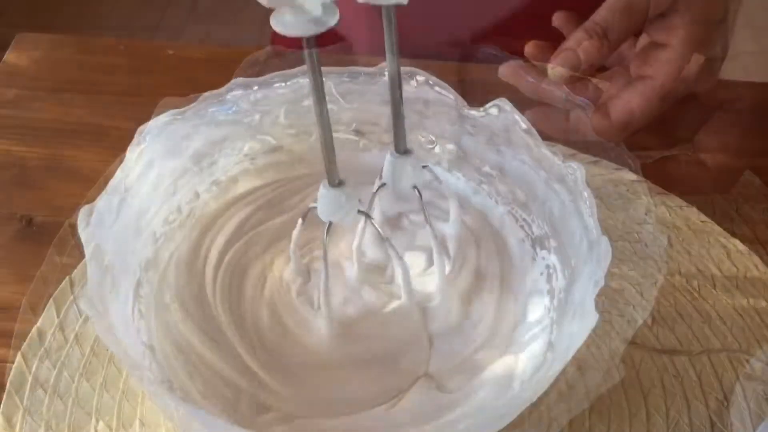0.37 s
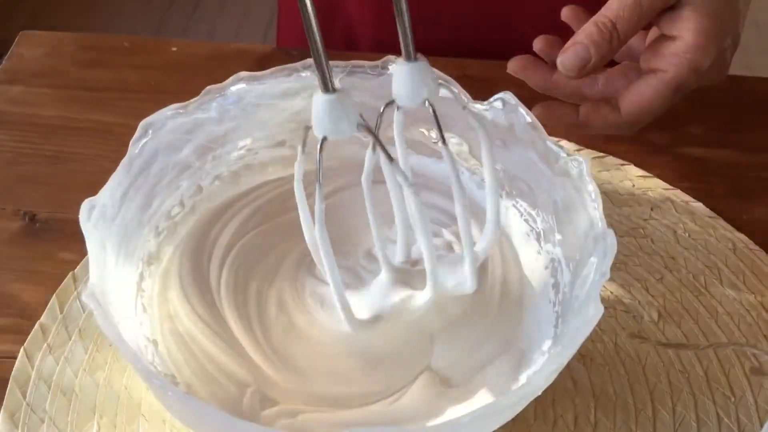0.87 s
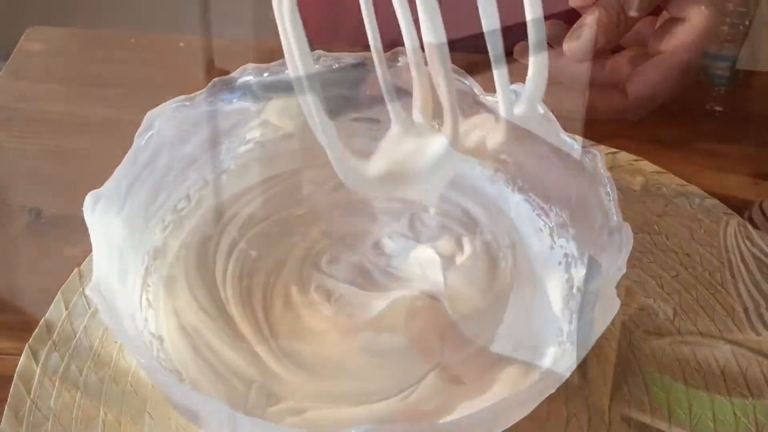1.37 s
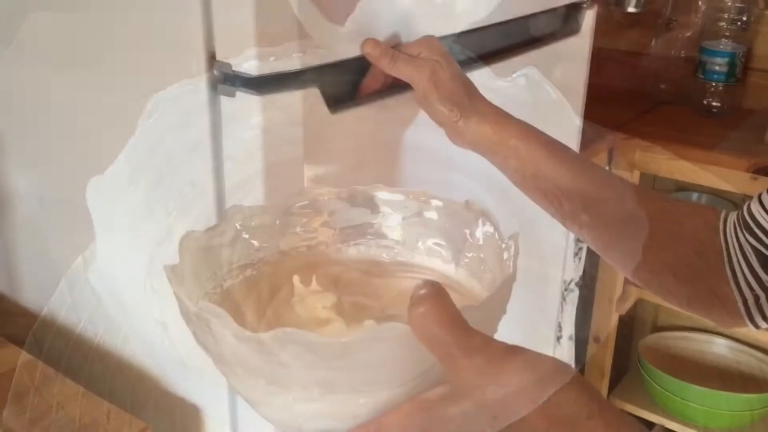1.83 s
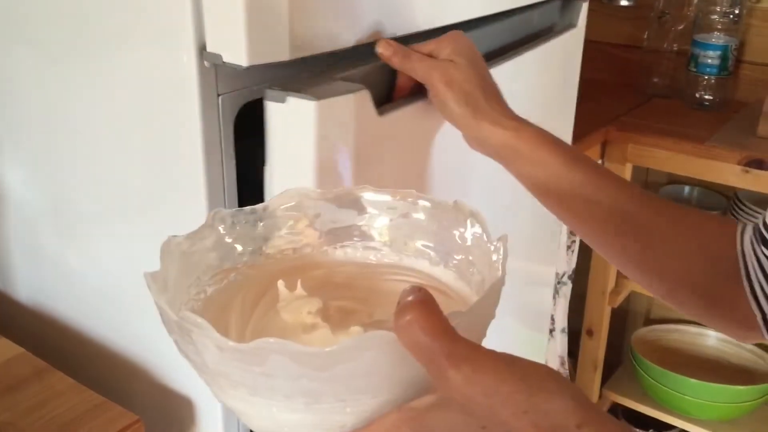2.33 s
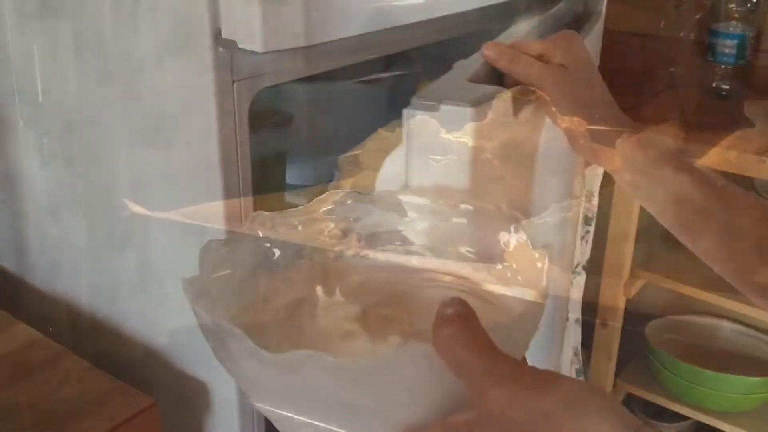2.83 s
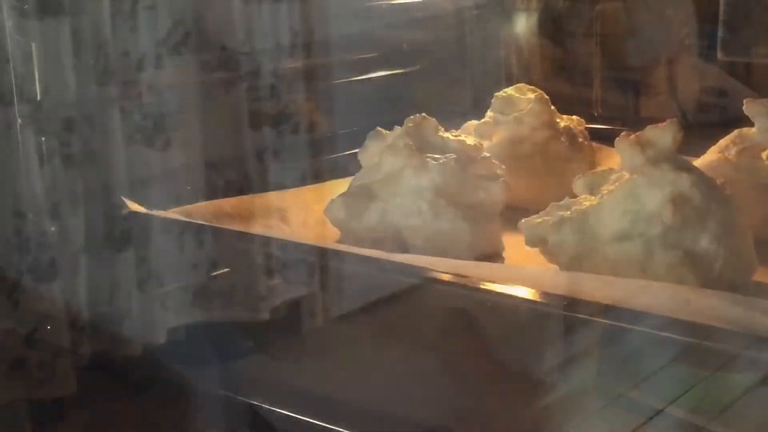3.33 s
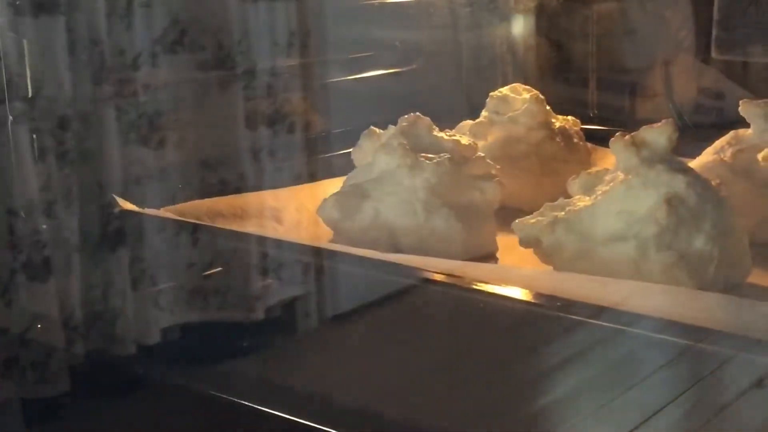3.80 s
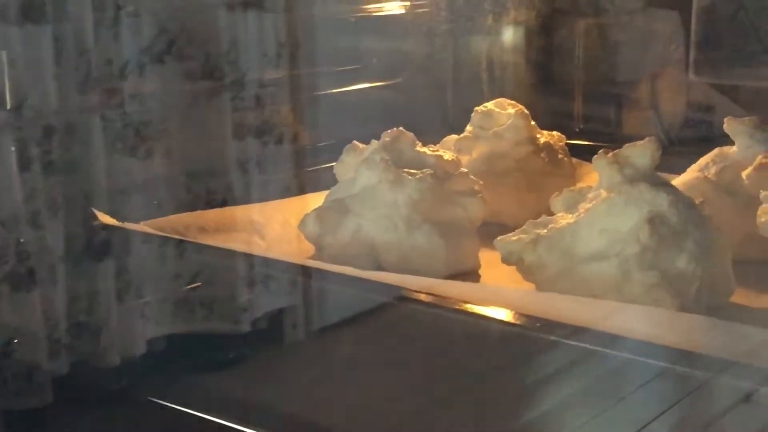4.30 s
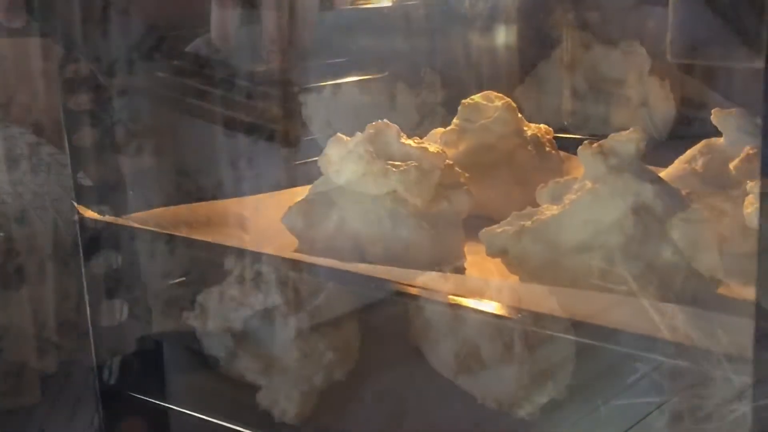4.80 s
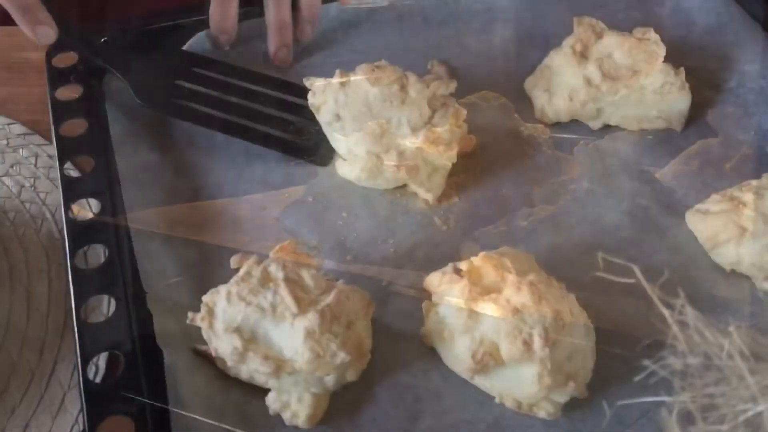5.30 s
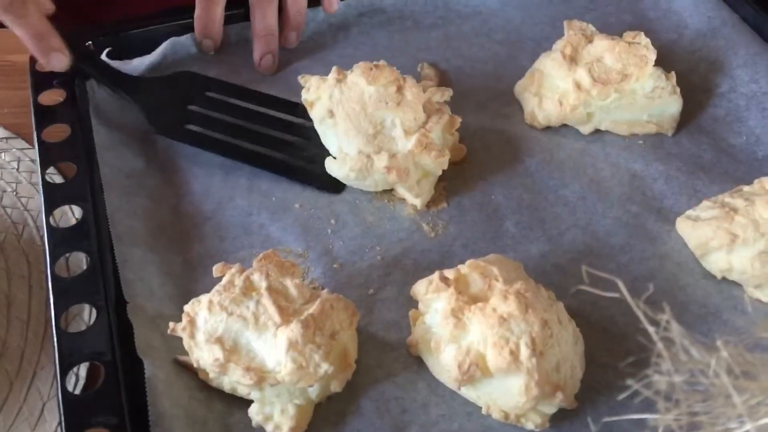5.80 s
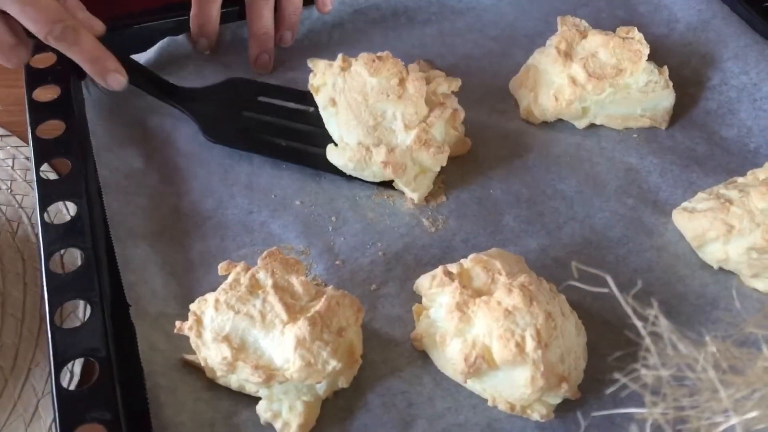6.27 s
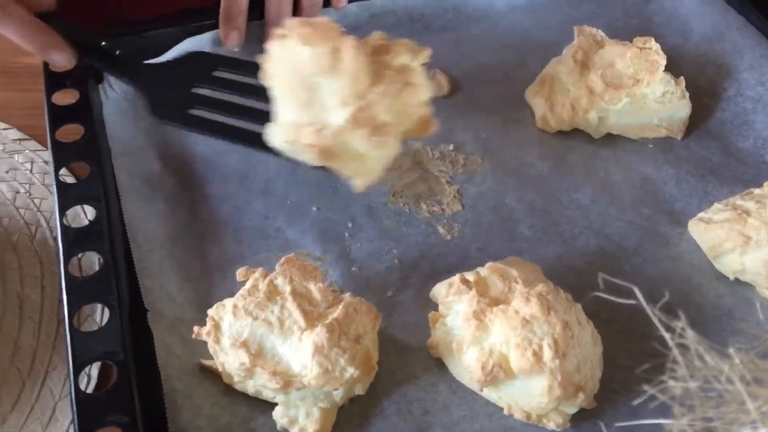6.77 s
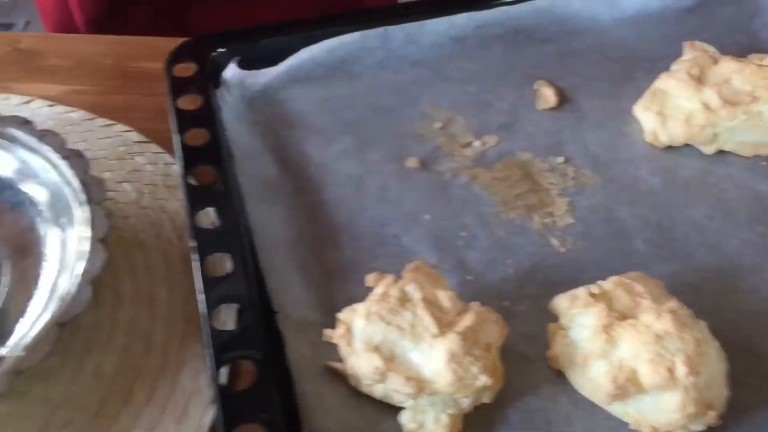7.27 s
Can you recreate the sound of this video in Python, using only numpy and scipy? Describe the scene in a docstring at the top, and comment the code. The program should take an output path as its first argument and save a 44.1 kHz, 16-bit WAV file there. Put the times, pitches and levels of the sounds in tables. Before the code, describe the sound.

Electric mixer drone fading quickly, fridge seal peel and thump, faint ticking over a low oven drone, then gritty scraping, crisp cracks and tray knocks.

```python
"""A spatula scrapes meringue off baking paper (gritty noise), the crust cracks (short noise splinters) and
the sheet-metal tray knocks on the table (struck modes): the last of four kitchen scenes. Before it a hand
mixer fades out (shaped noise, armature tones, mains buzz); a fridge door peels off its seal (noise snaps)
and thumps (modes); a wind-up timer ticks (modes) by an oven whose fan drones (resonant noise).
A small hard room (noise tail) and a wandering rumble and hiss lie behind it."""
import sys
import numpy as np
from scipy import signal
from scipy.fft import rfft, irfft
from scipy.io import wavfile
from scipy.ndimage import uniform_filter1d

SR = 44100
rng = np.random.default_rng(int(sys.argv[2]) if len(sys.argv) > 2 else 0)


def digitize_waveform(pressure):
    """Quantize a signal to 16-bit integers and store it at the path in sys.argv[1].

    Rows of a 2-D input are taken as channels; values are limited to [-1, 1].
    """
    field = np.atleast_2d(pressure).T
    bounded = np.clip(field, -1, 1)
    quanta = np.round(bounded * 32767).astype(np.int16)
    wavfile.write(sys.argv[1], SR, quanta)


def volts_from_db(level):
    """Convert decibel levels to linear amplitude ratios."""
    exponent = np.asarray(level, float) / 20
    return 10 ** exponent


N = 336483
t = np.arange(N) / SR
LEAD_S = .01  # a burst peaks this long after its start

# spatula on paper: t/s, level/dB, treble relative to it/dB
RUB_LEVELS = [(4.62, -70, -21), (4.69, -69, -4), (4.73, -58.5, 2), (4.78, -64, 5.5), (4.88, -52, -2),
              (4.97, -59, 1.5), (5.03, -43, -0.5), (5.11, -43.5, -2.5), (5.155, -48, -1.5),
              (5.185, -40.5, 3), (5.22, -46.5, -2), (5.28, -44.5, -0.5), (5.33, -46, -7.5),
              (5.38, -56, -1.5), (5.41, -43, 2), (5.47, -55, -5), (5.51, -50.5, 6.5), (5.535, -55.5, -5.5),
              (5.57, -46.5, -2.5), (5.67, -42.5, -0.5), (5.74, -57, 0), (5.765, -43.5, 0.5),
              (5.81, -41, -3), (5.835, -49, 5), (5.88, -40.5, -5), (5.93, -42.5, -2.5), (5.99, -51, -2.5),
              (6.07, -79, -4), (6.13, -51.5, 0.5), (6.22, -42, -0.5), (6.27, -56.5, -1.5), (6.3, -40, -5.5),
              (6.34, -58, 2), (6.41, -64, -5), (6.44, -49, 3.5), (6.52, -85, -15)]
# sheet-metal tray modes: f/Hz, level/dB, t60/s
TRAY_MODES = [(66.6, -7, 0.36), (87, -19, 0.45), (130.5, 0.5, 1), (147, -9.5, 0.14), (188.2, -4.5, 1),
              (241, -3.5, 0.23), (293, -3.5, 0.3), (378, -27.5, 0.22), (548.5, -2.5, 0.25), (643, -3, 0.28),
              (770, -28.5, 0.13), (850, -13.5, 0.54), (1070, -18, 0.17), (1034, -11, 0.74), (1180, -8, 0.3),
              (1254, -11, 0.21), (1310, -11.5, 0.48), (1410, -23.5, 0.19), (1518, -1, 0.3),
              (1800, -22, .25), (1787, 4, 0.083), (1753, 3, 0.19), (1930, -30.5, 0.17), (2076, -16.5, 0.2),
              (2104, -7, 0.35), (2320, -1, 0.16), (2440, -10, 0.2), (2570, -9.5, .2)]


def curve(rows):
    """Columns of a table of (s, value, ..) rows, joined by straight lines."""
    s, *columns = np.transpose(rows)
    return [np.interp(t, s, c) for c in columns]


def unit(x):
    """Scaled to rms 1."""
    return x / np.sqrt(np.mean(x ** 2))


def shape(x, db_of_hz):
    """Causal minimum-phase filter with the given dB response, built from the cepstrum."""
    cep = irfft(np.log(volts_from_db(db_of_hz(np.linspace(1, SR / 2, 2049)))))
    # fold the anticausal half onto the causal one
    cep[1:2048] *= 2
    cep[2049:] = 0
    return signal.fftconvolve(x, irfft(np.exp(rfft(cep))))[:len(x)]


def spectrum(points):
    """dB at any frequency from (Hz, dB) points, straight over log frequency."""
    hz_points, db_points = np.transpose(points)
    return lambda hz: np.interp(np.log(hz), np.log(hz_points), db_points)


def bumps(modes):
    """dB at any frequency from (Hz, width Hz, dB) peaks or dips."""
    return lambda hz: sum(db / (1 + (2 * (hz - f) / w) ** 2) for f, w, db in modes)


def treble(x, hz):
    """The part of x above hz."""
    return signal.sosfilt(signal.butter(2, hz, "high", fs=SR, output="sos"), x)


def band(x, low_hz, high_hz):
    """The part of x between two frequencies."""
    return signal.sosfilt(signal.butter(3, (low_hz, high_hz), "band", fs=SR, output="sos"), x)


def walk(rate, size=N):
    """Random levels held 1 / rate s and slewed twice; spread near 1."""
    k = int(SR / rate)
    held = np.repeat(rng.standard_normal(size // k + 1), k)
    return 1.3 * uniform_filter1d(uniform_filter1d(held, k), k)[:size]


def fade(s, start, end):
    """Gain running straight from 0 at start to 1 at end."""
    return np.clip((s - start) / (end - start), 0, 1)


def add(out, s, x, db):
    """Mix x, scaled to a peak of db, into out from time s."""
    i = int(s * SR)
    x = x[:N - i]
    out[i:i + len(x)] += volts_from_db(db) * x / np.abs(x).max()


def ring(modes, contact_ms, rattle_ms):
    """Struck body: a soft push and a dying rattle of smaller ones drive modes scattered at each blow."""
    blow_scatter_db, detune = 1.5, 0.0053
    u = np.arange(int(.6 * SR)) / SR
    body = np.zeros(len(u))
    for (hz, db, t60), (a, b) in zip(modes, rng.standard_normal((len(modes), 2))):
        tone = np.sin(2 * np.pi * hz * (1 + detune * b) * u)
        body += volts_from_db(db + blow_scatter_db * a) * tone * np.exp(-np.log(1000) * u / t60)
    hits = rng.random(len(u)) < 1500 / SR  # 1500 per s
    taps = hits * rng.standard_normal(len(u)) * 0.17 * np.exp(-u * 1000 / rattle_ms)
    taps[0] = 1
    push = signal.fftconvolve(taps, np.hanning(3 + int(contact_ms * SR / 1000)))
    return signal.fftconvolve(body, push)[:len(u)]


def burst(ms):
    """A splinter of noise that leaps to its peak LEAD_S in, then dies within a few lengths."""
    u_ms = (np.arange(4096) / SR - LEAD_S) * 1000
    return rng.standard_normal(4096) * np.exp(np.where(u_ms < 0, u_ms / 0.72, -2.5 * u_ms / max(ms, .2)))


def mixer_air(turn):
    """Brush and fan noise rung by the housing, throbbing at twice the half-turn rate."""
    # fan and brush noise: f/Hz, density/dB per Hz
    brush_noise = [(35, -55), (60, -17), (202, -14), (262, -11), (301, -15), (437, -13), (682, 1),
                   (749, -2.5), (2520, -7), (5210, -9), (8120, -20), (11300, -12.5), (16000, -16)]
    # housing resonances: f/Hz, width/Hz, level/dB
    housing = [(624, 90, 3.5), (1720, 81, 10.5), (2490, 100, 6.5), (3400, 120, 4.5), (4570, 210, 2.5),
               (5300, 220, 1), (7700, 150, -3), (9740, 300, 8), (11400, 250, 5.5), (13000, 250, 3)]
    noise = shape(shape(rng.standard_normal(N), spectrum(brush_noise)), bumps(housing))
    return unit(noise) * (1 + 0.15 * np.cos(2 * turn)) * volts_from_db(1.18 * walk(40))


def armature_tones(turn):
    """Armature, gear and commutator tones on multiples of the half-turn rate, wavering in level and phase."""
    # strong tones: multiple of the half-turn rate, level/dB
    strong = [(2, -20), (6, -16.5), (9, -18), (13, -12.5), (14, -16), (15, -12.5), (16, -10.5), (18, -14),
              (19, -15), (20, -15), (21, -26), (23, -17), (24, -10), (25, -10.5), (32, -20), (43, -16),
              (49, -14), (50, -16), (60, -20), (62, -28), (72, -20), (86, -29), (96, -21), (107, -29),
              (108, -20), (120, -24)]
    minor_db, fall_db_per_octave, scatter_db = -23.5, 4.5, 4
    flicker_db, roughness_rad = 4.5, .13
    minor = []
    for k in range(26, 140):
        db = minor_db - fall_db_per_octave * np.log2(k / 26) + scatter_db * rng.standard_normal()
        minor.append((k, db))
    n = len(turn)
    tones = np.zeros(n)
    for k, db in strong + minor:
        jitter = roughness_rad * np.sqrt(k) * walk(70.7, size=n)
        phase = k * turn + rng.uniform(0, 2 * np.pi) + jitter
        tones += volts_from_db(db + flicker_db * walk(24.4, size=n)) * np.sin(phase)
    return tones


def mains_buzz():
    """Magnetic buzz: fixed-pitch harmonics of twice the mains rate, flickering slightly in level."""
    # harmonics: multiple of twice the mains rate, level/dB
    harmonics = [(1, -25), (2, -23), (3, -13), (4, -15.5), (7, -11), (8, -8.5), (11, -15)]
    buzz_hz, flicker_db = 100., 1.2
    out = np.zeros(N)
    for k, db in harmonics:
        phase = 2 * np.pi * k * buzz_hz * t + rng.uniform(0, 2 * np.pi)
        out += volts_from_db(db + flicker_db * walk(8.1)) * np.sin(phase)
    return out


def mixer():
    """A motor of slightly wavering speed drives noise and tones over mains buzz; a beater clips the bowl."""
    half_turn_hz, speed_waver = 106.1, .002
    level_db, fade_start_s, fade_end_s = -40.5, 0.13, .665
    turn = 2 * np.pi * np.cumsum(half_turn_hz * (1 + speed_waver * walk(15.4))) / SR
    motor = mixer_air(turn)
    # the first second outlasts the fade
    motor[:SR] += armature_tones(turn[:SR]) + mains_buzz()[:SR]
    out = motor * volts_from_db(level_db) * (1 - fade(t, fade_start_s, fade_end_s))
    add(out, .207 - LEAD_S, band(burst(15), 600, 3200), -30)  # bowl
    return out


def background():
    """Room rumble that wanders and a smooth hiss above it, split from one shaped noise."""
    # levels: t/s, rumble/dB, hiss/dB
    air_levels = [(0.7, -63.5, -68.5), (1.5, -68.5, -72.5), (2.05, -65.5, -70), (2.62, -65.5, -70.5),
                  (3.0, -69, -72.5), (3.75, -66.5, -69.5), (4.6, -65.5, -70), (6.95, -65, -67),
                  (7.17, -66, -71.5), (7.42, -65.5, -67.5), (7.63, -67, -64.5)]
    # room tone: f/Hz, density/dB per Hz
    room_tone = [(15, -43), (25, -22.5), (53, 1), (92, -5.5), (195, -7), (309, -8), (344, -12.5),
                 (591, -20.5), (677, -21.5), (1070, -23.5), (2480, -28), (3620, -30.5), (16000, -40)]
    rumble_db, hiss_db = curve(air_levels)
    tone = shape(rng.standard_normal(N), spectrum(room_tone))
    hiss = treble(tone, 530)
    rumble = unit(tone - hiss) * volts_from_db(rumble_db + 0.66 * walk(5.5))
    return rumble + unit(hiss) * volts_from_db(hiss_db + 0.21 * walk(8.8))


def squeaks():
    """Faint squeaks and chirps of handling: narrow noise bands under smooth swells."""
    # squeaks: t/s, length/s, f/Hz, peak/dB
    chirps = [(.9, .04, 3650, -68), (1.29, .04, 1200, -68), (1.47, .03, 3100, -72), (1.72, .12, 1080, -63),
              (2.91, .07, 1460, -64), (4.705, .045, 270, -61), (4.75, .05, 370, -61)]
    out = np.zeros(N)
    for s, length_s, hz, db in chirps:
        n = int(length_s * SR)
        noise = band(rng.standard_normal(SR // 2), hz * .96, hz * 1.04)
        add(out, s, np.hanning(n) * noise[-n:], db)
    return out


def seal_snaps():
    """Fridge seal and shelf snaps: coloured noise bursts, each with its own treble slope."""
    # snaps: t/s, peak/dB, slope above 2800 Hz/dB per octave, length/ms
    snaps = [(1.963, -52, 7, 9.2), (2.12, -39, 3, 6.5), (2.162, -30, 3, 36), (2.194, -26, 0.5, 39),
             (2.356, -45, -33, 24), (2.52, -46, -34, 43)]
    # common colour: f/Hz, density/dB per Hz
    snap_colour = [(150, -3.5), (450, 0.5), (700, -2), (1200, 0), (1700, -2), (2600, -6), (3400, -9.5),
                   (5500, -19.5), (16000, -39)]
    out = np.zeros(N)
    for s, db, slope_db, ms in snaps:
        colour = lambda hz: spectrum(snap_colour)(hz) + slope_db * np.log2(np.maximum(hz / 2800, 1))
        add(out, s - LEAD_S, shape(burst(ms), colour), db)
    return out


def peel():
    """Rubber letting go in a fine crackle: band noise that leaps up, holds, then falls in two slopes."""
    hold_start_s, hold_end_s = 2.14, 2.23
    peel_db, rise_db_per_s, fall_db_per_s = -57.5, 602, 170
    drag_db, drag_fall_db_per_s = -61.5, 55  # the hinge drags on after the seal has let go
    crackle = unit(band(rng.standard_normal(N), 360, 2240)) * volts_from_db(1.5 * walk(90))
    early_s, late_s = (hold_start_s - t).clip(0), (t - hold_end_s).clip(0)
    fall = volts_from_db(peel_db - fall_db_per_s * late_s) + volts_from_db(drag_db - drag_fall_db_per_s * late_s)
    return crackle * fall * volts_from_db(-rise_db_per_s * early_s)


def door_thumps():
    """The fridge door panel booms: struck modes with a shudder of smaller pushes."""
    # thumps: t/s, peak/dB, contact/ms, shudder/ms
    thumps = [(2.151, -42.5, 2.7, 64), (2.198, -26.5, 0.62, 29), (2.362, -31.5, 4.2, 18),
              (2.379, -35, 2.7, 12)]
    # door panel modes: f/Hz, level/dB, t60/s
    door_modes = [(64.3, -15, 0.44), (125.6, -7, 0.34), (164, -13.5, 0.36), (208.6, -1, 0.15),
                  (253, -5.5, 0.15), (305, -10.5, 0.078), (335.4, -14, 0.37), (451, -7.5, 0.089),
                  (600, -4, 0.15), (735, -21, .1)]
    out = np.zeros(N)
    for s, db, contact_ms, shudder_ms in thumps:
        add(out, s, treble(ring(door_modes, contact_ms, shudder_ms), 78), db)
    return out


def oven_scene():
    """Gain of the oven scene as it fades in and out."""
    return fade(t, 2.6, 3.75) * (1 - fade(t, 4.3, 4.95))


def oven_fan():
    """The oven fan's low drone: noise through one resonance."""
    drone = signal.lfilter(*signal.iirpeak(86, 4.0, SR), rng.standard_normal(N))
    return unit(drone) * volts_from_db(-67.5) * oven_scene()


def timer():
    """The escapement strikes twice within a few ms: the short ring of the small case and a noise click."""
    # timer case modes: f/Hz, level/dB, t60/s
    case_modes = [(1720, -8.5, 0.14), (2010, -10, 0.076), (2386, -6.5, 0.09), (2910, 8, 0.034),
                  (2870, -17, 0.02), (3430, -15, 0.11), (4970, -8, 0.079), (5910, 1.5, 0.011),
                  (6490, -7, 0.041), (8830, -4.5, 0.01), (9100, -7, 0.017)]
    first_tick_s, beat_s, tock_lag_s = 2.7955, .5344, .2585  # slightly out of beat
    # dull tick, bright tock: lag/s, reference level/dB, gain above 2650 Hz/dB
    strokes = ((0, -49, -10), (tock_lag_s, -43.5, 6.5))
    out = np.zeros(N)
    for beat in first_tick_s + beat_s * np.arange(4):
        for stroke_lag_s, db, treble_db in strokes:
            s = beat + stroke_lag_s
            for lag_s, part_db in ((-.001, 0.92), (.0015, 3.3)):
                tick = ring(case_modes, .05, 2.5)
                high = treble(tick, 2650)
                add(out, s + lag_s, tick - high + volts_from_db(treble_db) * high, db + part_db)
            add(out, s - LEAD_S, band(burst(27), 2080, 3560), db - 4.5)
    return out * oven_scene()


def gritty_rub():
    """Crumbs of very uneven size over a smooth rub, coloured by paper on the tray, which hums along."""
    # paper on tray: f/Hz, density/dB per Hz
    paper = [(180, -37.5), (300, -16.5), (332, -16.5), (386, -11), (539, -7), (717, -12.5), (987, -2.5),
             (1360, -3), (1500, 0.5), (2030, 0.5), (4100, -3), (4460, -6), (5460, -9), (15200, -16),
             (16500, -38)]
    crumbs_per_s, crumb_spread_db, grit_depth, tray_hum = 400, 3.5, .5, .22
    hits = rng.random(N) < crumbs_per_s / SR
    crumbs = hits * volts_from_db(crumb_spread_db * rng.exponential(size=N).clip(0, 3))
    # each crumb is about a millisecond of grit
    grit = unit(signal.lfilter([1], [1, -.97], crumbs))
    rub = shape(rng.standard_normal(N) * (1 + grit_depth * grit), spectrum(paper))
    hum = treble(signal.fftconvolve(rub, ring(TRAY_MODES, .1, 0.94))[:N], 900)
    return unit(rub) + tray_hum * unit(hum)


def scrape():
    """The rub swells with each push in three bands, and each half octave also swells on its own."""
    patchy_db, patches_per_s = 2.5, 25
    body_db = -0.5  # below 2800 Hz
    level_db, treble_db = curve(RUB_LEVELS)
    rub = gritty_rub()
    edges_hz = 700 * 2 ** np.arange(0, 4.6, .5)
    patches = np.zeros(N)
    for low_hz, high_hz in zip(edges_hz, edges_hz[1:]):
        patches += (volts_from_db(patchy_db * walk(patches_per_s)) - 1) * band(rub, low_hz, high_hz)
    rub = rub + patches
    upper = treble(rub, 2800)
    high = treble(upper, 3670)
    rub = volts_from_db(body_db) * unit(rub - upper) + unit(upper - high) + volts_from_db(treble_db) * unit(high)
    active = (t > RUB_LEVELS[0][0]) * (t < RUB_LEVELS[-1][0])
    return rub * volts_from_db(level_db) * volts_from_db(2.0 * walk(60)) * active


def scattered_cracks():
    """Rows like those of set_cracks, scattered over the scrape, their peaks following the rub's level."""
    count, over_rub_db, scatter_db = 60, 11, 1
    centre_hz, treble_db, length_ms = 4200, -4.5, 2
    at, size, pitch = rng.random((count, 3)).T
    start_s, end_s = RUB_LEVELS[0][0], RUB_LEVELS[-1][0]
    s = start_s + (end_s - start_s) * (np.arange(count) + at) / count
    rub_db = curve(RUB_LEVELS)[0][(s * SR).astype(int)]
    db = rub_db + over_rub_db - scatter_db * np.log(size + 0.202)
    hz = centre_hz * 2 ** (2 * pitch - 1)  # within an octave either way
    return [(a, b, c, treble_db, length_ms) for a, b, c in zip(s, db, hz)]


def cracks():
    """Each crack is a wide splinter that favours one stiff patch of crust."""
    # cracks of crust and paper at set times, loud and faint:
    # t/s, peak/dB, ring f/Hz, gain above 4800 Hz/dB, length/ms
    set_cracks = [(4.6522, -43.5, 2870, -34, 3.4), (4.6787, -46, 5840, -9, 1.8),
                  (4.6985, -30.5, 3930, 3.5, 5), (4.8348, -34, 6700, 2, 2.2), (4.8834, -24.5, 5800, 5, 2.5),
                  (4.895, -42, 4470, -8, 2.5), (4.913, -37.5, 3800, -6, 2), (5.257, -28, 3390, -10, 5.4),
                  (5.2842, -30, 3300, -13, 2.2), (5.305, -31, 9100, -6.5, 3.7),
                  (5.3188, -19.5, 9050, -7, 1.7), (5.3388, -18.5, 5840, -14, 4.1),
                  (5.402, -26.5, 4160, -2.5, 3.9), (5.4308, -29, 11300, -11, 6.3),
                  (5.5033, -31, 3800, -12, 7.4), (5.5415, -16, 4460, -12, 0.73),
                  (5.5565, -25, 6270, -13.5, 1.7), (5.7521, -27, 3130, 0.5, 1.7),
                  (5.7783, -26.5, 3260, -5.5, 4.7), (5.8148, -31, 4370, -8, 3.1),
                  (5.8707, -24, 3050, -5, 10), (5.877, -16.5, 4570, 1.5, 0.76),
                  (5.8811, -7.5, 11500, -26, 7.1), (5.911, -28, 8500, -9.5, 2.2),
                  (6.0807, -41.5, 12100, -9, 2.4), (6.0917, -38.5, 3420, 1, 2.4),
                  (6.14, -31.5, 3150, -16.5, 2.6), (6.1702, -30.5, 6150, -8, 3.1),
                  (6.2255, -27.5, 6580, -10, 2.6), (6.2316, -20.5, 3400, -2, 4),
                  (6.241, -26.5, 5000, -5, 1.8), (6.2452, -15.5, 7100, -5.5, 3.6),
                  (6.31, -23.5, 2000, -1, 2.1), (6.418, -34.5, 2110, 9, 2.5), (6.4358, -32, 7060, -12, 2),
                  (6.4415, -39.5, 2410, -4, 3.5), (6.58, -47.5, 3140, -9, 2), (6.6288, -26, 2870, 2, 2.7),
                  (6.6626, -35.5, 7500, -8, 3.4), (6.6974, -49.5, 2930, -10.5, 2.2),
                  (6.764, -35.5, 4300, -14, 6.4), (6.785, -43.5, 3740, -9, 3.3),
                  (6.808, -48, 3900, -8.5, 2.3), (6.8342, -37, 3260, -16.5, 2.2),
                  (6.8422, -16.5, 5500, -9.5, 9.5), (6.8628, -28.5, 6090, 6, 3.5),
                  (6.8979, -38, 3430, -11.5, 7.2), (7.1126, -13.5, 3400, -2.5, 3.1),
                  (7.588, -49.5, 3150, -9.5, 3.2)]
    patch_q = 2.5
    out = np.zeros(N)
    for s, db, hz, treble_db, ms in set_cracks + scattered_cracks():
        splinter = burst(ms)
        # the louder the crack, the more it shakes the tray below
        shake = volts_from_db(-11.0 + 0.49 * (db + 7)) * band(splinter, 490, 1600)
        raw = treble(treble(splinter, 1600), 1600) + shake
        high = treble(raw, 4800)
        patch = signal.lfilter(*signal.iirpeak(hz, patch_q, SR), raw)
        add(out, s - LEAD_S, raw - high + volts_from_db(treble_db) * high + 1.73 * patch, db)
    return out


def tray():
    """Sheet-metal modes, a dull table thud and a paper buzz, muffled once the tray settles on its mat."""
    # knocks: t/s, peak of the modes/dB, contact/ms, rattle/ms, free to ring/s
    knocks = [(5.194, -28, 0.085, 25, 0.12), (5.587, -41.5, 4.05, 98, 0.12), (5.968, -38.5, 2.8, 11, 0.069),
              (6.290, -18, 0.25, 27, 0.2), (6.368, -27.5, 0.087, 17, 0.1)]
    settle_s = .025
    out = np.zeros(N)
    for s, db, contact_ms, rattle_ms, free_s in knocks:
        knock = treble(ring(TRAY_MODES, contact_ms, rattle_ms), 66)
        u = np.arange(len(knock)) / SR
        settle = np.exp(-np.clip(u - free_s, 0, None) / settle_s)
        thud = band(rng.standard_normal(len(u)) * settle * np.exp(-u / 0.063), 110, 318)
        buzz = band(rng.standard_normal(len(u)) * settle * np.exp(-u / 0.031), 470, 2260)
        add(out, s, knock * settle, db)
        add(out, s, thud, db - 10.0)
        # a harder knock, of shorter contact, buzzes the loose paper more
        add(out, s, buzz, db - 3.0 - 8 * contact_ms)
    return out


def room(x):
    """Diffuse tail of a small hard kitchen, the treble dying first."""
    t60_s, top_t60_s, tail_db, top_db = .2, .14, -15, -5
    u = np.arange(SR // 2) / SR
    noise = rng.standard_normal(len(u))
    high = treble(noise, 5600)
    tail = (noise - high) * volts_from_db(-60 * u / t60_s) + high * volts_from_db(top_db - 60 * u / top_t60_s)
    tail = tail * np.clip(u / 0.0039, 0, 1)
    tail = tail / np.sqrt(np.sum(tail ** 2))
    return x + volts_from_db(tail_db) * signal.fftconvolve(x, tail)[:N]


def scene():
    """Close sounds through the room, over mixer, background and oven fan."""
    fridge = squeaks() + seal_snaps() + peel() + door_thumps()
    close = fridge + timer() + scrape() + cracks() + tray()
    return (room(close) + mixer() + background() + oven_fan())[None]


def low_pass(x):
    """Removes everything above the highest recorded frequency."""
    return signal.sosfilt(signal.butter(12, 16970, fs=SR, output="sos"), x)


def record(dry):
    """The microphone cuts both ends and its housing dents the treble in a few places."""
    # housing dips: f/Hz, width/Hz, level/dB
    mic_dips = [(4974, 150, -7.5), (7650, 240, -4), (10440, 260, -7.5)]
    low_cut = treble(treble(dry[0], 40), 40)
    both_cut = signal.sosfilt(signal.butter(6, 16200, fs=SR, output="sos"), low_cut)
    return low_pass(shape(both_cut, bumps(mic_dips))[None])


dry = scene()
out = record(dry)
digitize_waveform(out)
```